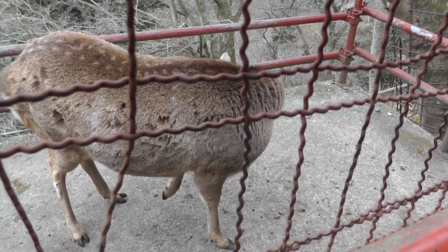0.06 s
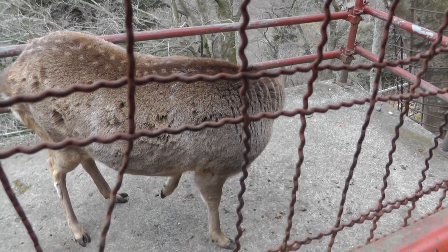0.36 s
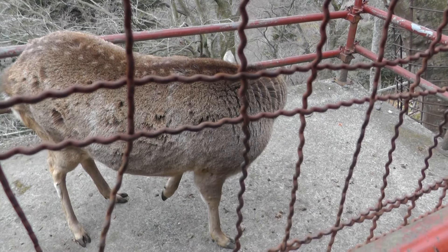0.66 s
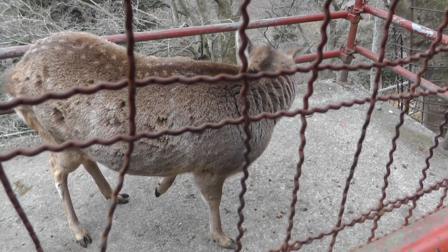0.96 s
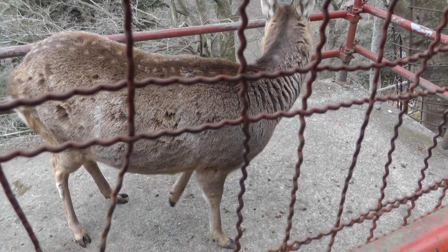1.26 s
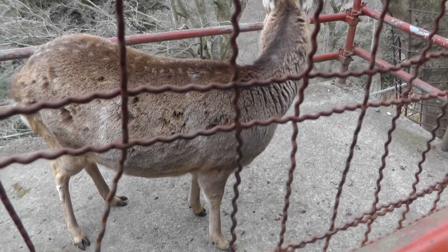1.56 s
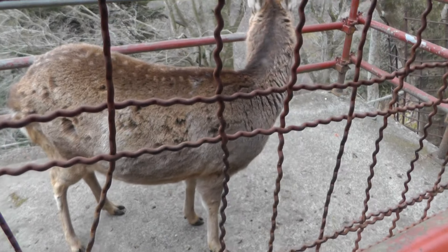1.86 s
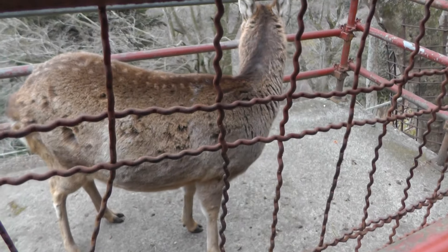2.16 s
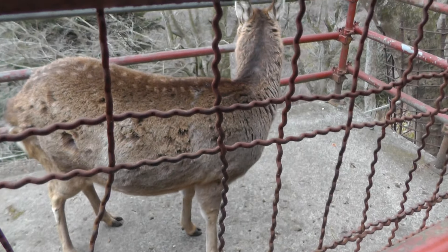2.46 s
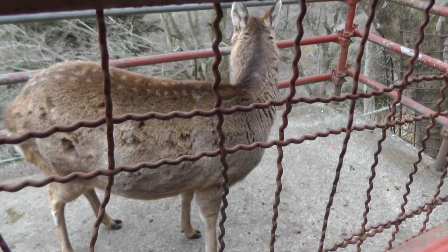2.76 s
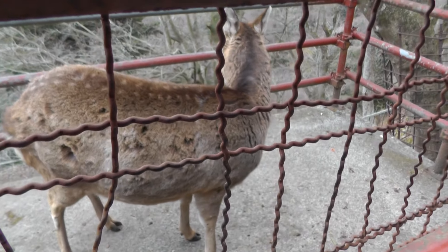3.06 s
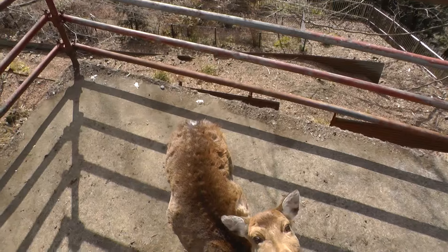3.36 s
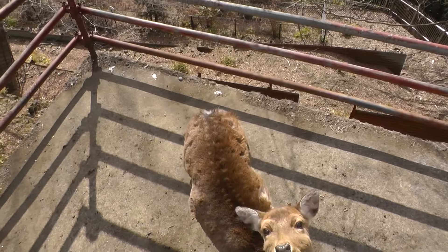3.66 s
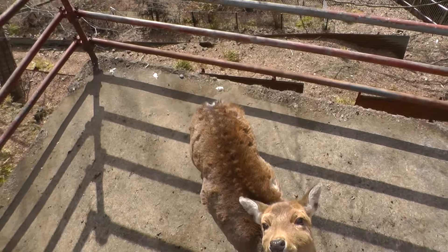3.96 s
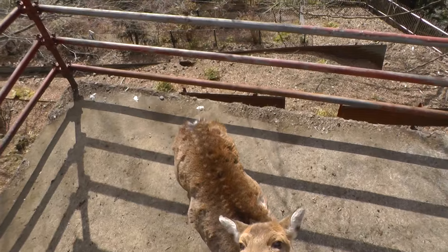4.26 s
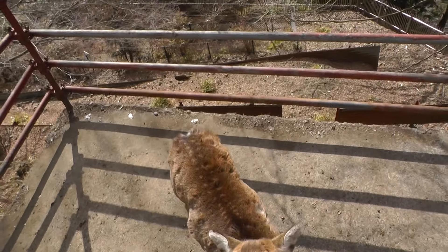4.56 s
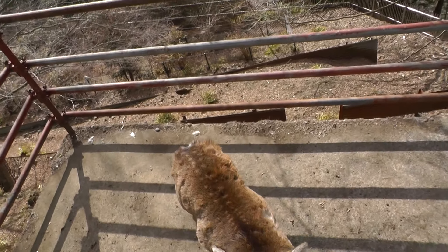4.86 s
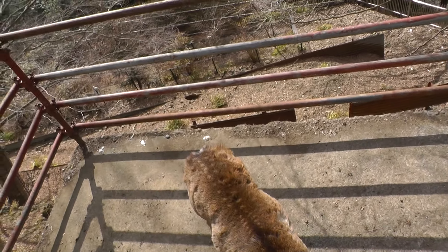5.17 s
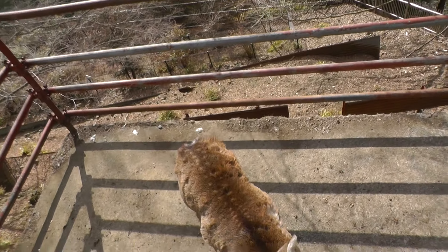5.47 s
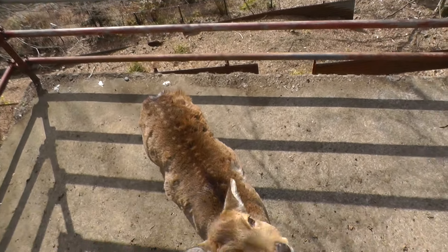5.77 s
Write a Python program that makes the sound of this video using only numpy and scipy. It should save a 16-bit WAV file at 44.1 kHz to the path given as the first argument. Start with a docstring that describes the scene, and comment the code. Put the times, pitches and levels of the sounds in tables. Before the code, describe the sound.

In a quiet outdoor pen, a deer gives one thin, high squeal that arches and ends breathy. A small bird whistles quick phrases behind it while hooves tap lightly on concrete and a camera's zoom motor hums faintly. After a light double tick the sound changes abruptly: cloth rubs and crackles close to the microphone, left of centre, and wind thumps in low gusts. Distant woods murmur softly throughout.

```python
"""Deer squeal in a concrete pen, then cloth and wind

A deer's tight vocal folds give one thin, arched squeal; a small bird whistles in the trees behind.
Hooves tap the floor, a camera's zoom motor hums, something ticks. Then the scene changes abruptly:
cloth rubs and crackles by the left microphone and wind thumps on the camera. Woods murmur throughout."""
import sys
import numpy as np
from scipy import signal
from scipy.fft import rfft, irfft, next_fast_len
from scipy.io import wavfile
from scipy.ndimage import uniform_filter1d, map_coordinates

SR = 44100
rng = np.random.default_rng(int(sys.argv[2]) if len(sys.argv) > 2 else 0)


def unload_audio(sound):
    """Save the sound as a 16-bit wav file, at the path given as the first command line argument."""
    columns = np.transpose(np.atleast_2d(sound))
    # keep every value between -1 and 1, then stretch to whole-number steps
    steps = np.round(np.clip(columns, -1, 1) * 32767)
    wavfile.write(sys.argv[1], SR, steps.astype(np.int16))


N = 260190
CHANGE_S = 3.311

# stereo image of close sounds: (frequency [Hz], left-right likeness [-1..1])
CLOSE_LIKENESS = [(500, 0.97), (2000, 0.74), (6000, 0.94), (7500, 0.3), (9000, -0.37), (12000, -0.65),
                  (15500, -0.72)]


def deer(crest_hz=2059, crest_s=.14, collapse_s=.555, start_s=.13, end_s=.64, jitter=.0045, rasp=.0367):
    """Tight vocal folds whistle and double their period; air rasps through as the pitch drops."""
    # throat and nose response: (frequency [Hz], gain [dB])
    throat = [(1000, -44), (2030, -23.5), (2450, 5), (3050, -16), (3350, 2.5), (3750, -12), (4080, -0.5),
              (5100, -1.5), (5600, 5.5), (6100, -8), (7100, -17), (8150, -14), (9200, -9), (10200, -17),
              (11200, -25), (13500, -30)]
    # breath spectrum: (frequency [Hz], density [dB])
    breath = [(1000, -52), (2000, -17), (3000, -13), (4500, -3), (5600, -3.5), (7000, -14), (8500, -11.5),
              (10500, -19), (12500, -25), (16000, -30)]
    size = SR
    t = np.arange(size) / SR
    climb_hz_per_s, sag_hz_per_s, collapse_hz_per_s, inertia_s = 4400, 150, 6600, .0503
    pitch = (crest_hz - climb_hz_per_s * np.maximum(crest_s - t, 0)
             - sag_hz_per_s * np.maximum(t - crest_s, 0)
             - collapse_hz_per_s * np.maximum(t - collapse_s, 0))
    pitch = uniform_filter1d(np.maximum(pitch, crest_hz / 2), size=int(inertia_s * SR))
    tight_s, tight_length_s = .409, .23
    tight = np.exp(-(2 * (t - tight_s) / tight_length_s) ** 4)
    slack = 1 - pitch / crest_hz
    air_share = np.clip(.32 - .19 * tight + 1.25 * slack, 0, 1)
    pitch = pitch * (1 + jitter * wobble(260, size) + rasp * air_share * wobble(900, size))
    phase = 2 * np.pi * np.cumsum(pitch) / SR

    def partial(k, flutter_db=3):
        return amp(along(throat, k * pitch) + flutter_db * wobble(69.7, size)) * np.sin(k * phase)

    doubling = amp(-19 + 14.5 * tight)  # lines halfway between harmonics
    tone = sum(partial(k) + doubling * partial(k + .5) for k in range(1, 7))
    air = coloured(rng.standard_normal(size) * (1 + .5 * np.cos(phase)), breath)  # pulsed by the folds
    voice = voice_crack(t) + amp(1) * np.sqrt(1 - air_share) * tone + amp(-2) * np.sqrt(air_share) * air
    swell_db = -47.5 + 3 * (t - start_s)
    envelope = amp(swell_db) * held(t, start_s, end_s, attack_s=.1, release_s=.087)
    return pan(-3.5) * outdoors(np.pad(envelope * voice, (0, N - size)), wet_db=-5, likeness=.54)


def voice_crack(t, at_s=.185, length_s=.019, centre_hz=2500, width_hz=760):
    """The voice cracks once into a low rasp."""
    noise = filtered(rng.standard_normal(len(t)), lambda hz: resonance(hz, centre_hz, width_hz) ** 2)
    return amp(-8.5) * unit(noise) * np.exp(-(2 * (t - at_s) / length_s) ** 2)


def bird(arch_after_s=.129, arch_gap_s=.098, flutter_db=2):
    """Phrases of a slur and two arches, then flicks; in the slur both sides of the syrinx sound."""
    # syllable contours: (time [s], pitch [Hz], relative level [dB])
    slur = [(0, 5870, -12), (.007, 6550, -2), (.016, 6190, 0.5), (.026, 5650, -13), (.047, 5290, -0.5),
            (.062, 4700, -5), (.078, 4330, -3), (.098, 4100, -28)]
    undertone = [(0, 4090, -45), (.014, 4350, -14), (.026, 4700, -8), (.046, 5250, -2), (.06, 5450, -32)]
    arch = [(0, 6950, -31), (.012, 8100, -15.5), (.03, 8840, -19.5), (.04, 7890, -2.5), (.048, 7740, -7),
            (.058, 8150, -6.5), (.07, 7520, -6), (.077, 6400, -23)]
    flick = [(0, 3620, -17), (.008, 4710, -5.5), (.02, 5390, -4.5), (.027, 6460, 4.5), (.032, 7000, -0.5),
             (.043, 5700, -21)]
    # phrases: (start [s], slur gain [dB], arch gain [dB])
    phrases = [(0.527, -57, -47.5), (.923, -52.5, -45.5), (1.317, -50, -46.5), (1.715, -47.5, -46),
               (2.122, -46.5, -44)]
    # closing flicks: (start [s], gain [dB])
    flicks = [(2.5, -45.5), (2.601, -46), (2.711, -49), (3.249, -53)]
    song = np.zeros(N)
    for s, slur_db, arch_db in phrases:
        add(song, s, amp(slur_db) * syllable(slur, onset_rasp=.021))
        add(song, s, amp(slur_db) * syllable(undertone))
        for k in range(2):
            add(song, s + arch_after_s + k * arch_gap_s, amp(arch_db) * syllable(arch))
    for s, db in flicks:
        add(song, s, amp(db) * syllable(flick, onset_rasp=.237))
    return pan(2) * outdoors(song * amp(flutter_db * wobble(200)), wet_db=-3, likeness=.81)


def syllable(contour, onset_rasp=0, steady_rasp=.018, clear_s=.0313):
    """One swept whistle; rasp is its tremble as a share of the pitch."""
    times, pitches, levels = np.transpose(contour)
    t = np.arange(int(times[-1] * SR)) / SR
    rasp = steady_rasp + onset_rasp * np.maximum(1 - t / clear_s, 0)
    pitch = np.interp(t, times, pitches) * (1 + rasp * wobble(1500, SR // 4)[:len(t)])
    return amp(np.interp(t, times, levels)) * np.sin(2 * np.pi * np.cumsum(pitch) / SR)


def hooves(clack_t60_s=.0095, grit_t60_s=.12, grit_db=-15):
    """Horn clacks on concrete and grinds a little grit."""
    # hoof contacts: (time [s], relative level [dB], tilt [dB/octave])
    contacts = [(0.886, -47, 11), (0.905, -54, -2), (1.523, -46, -6), (1.6075, -35, 1.5),
                (1.708, -32.5, -1.5), (2.48, -47.5, 2), (2.695, -45, -1)]
    # clack spectrum: (frequency [Hz], density [dB])
    spectrum = [(100, -24), (350, 0.5), (550, 0.5), (850, -4.5), (1350, 0.5), (2100, -14.5), (3300, -8.5),
                (5000, -13.5), (8000, -17.5), (15000, -59)]
    steps, t = np.zeros(N), np.arange(SR // 8) / SR
    decay = amp(-60 * t / clack_t60_s) + amp(grit_db - 60 * t / grit_t60_s)
    for s, db, tilt in contacts:
        noise = rng.standard_normal(len(t))
        noise = filtered(noise, lambda hz: amp(along(spectrum, hz) + tilt * np.log2(hz / 1000 + .25)))
        clack = noise * decay
        add(steps, s, amp(db - 6.5) * clack / np.sqrt(np.mean(clack[:128] ** 2)))
    return outdoors(steps, wet_db=-9, likeness=.55)


def cloth():
    """A jacket rubs by the left microphone: hiss over hollow scuffing, and creases flipping over."""
    # rubbing spectra: (frequency [Hz], density [dB])
    hiss_spectrum = [(940, -34), (1600, -7), (2010, -9.5), (3100, -3), (4050, -8.5), (4680, -3),
                     (5890, -3.5), (7270, -7), (8980, -13.5), (13400, -17), (15200, -17), (15800, -16)]
    body_spectrum = [(100, -10), (250, -4), (450, 4), (680, 4.5), (1000, 1), (1400, -1), (1900, -12),
                     (3000, -56), (6000, -58)]
    # stereo balance: (frequency [Hz], left minus right [dB])
    balance = [(200, 2.5), (380, 1.5), (700, 1.5), (1290, 5), (2380, 5.5), (4400, 4.5), (8120, 4.5),
               (12000, -1)]
    # big creases: (time [s], relative level [dB], pitch [Hz])
    big_creases = [(4.063, -26, 5370), (4.143, -17, 4220), (4.37, -27, 5700), (4.529, -24.5, 2820),
                   (4.839, -22, 5090), (4.948, -27, 5350), (5.148, -19, 3700), (5.2205, -24, 4040),
                   (5.2344, -20.5, 1050), (5.692, -17.5, 680), (5.716, -21, 4200), (5.771, -18, 4500),
                   (5.792, -16.5, 810), (5.864, -19, 5120), (5.878, -16, 5900)]
    hiss_gain, body_gain = rubbing()
    grip = amp(wobble(45) + .36 * wobble(220))  # contact tightens and slackens
    hiss = coloured(grip * friction(slips_per_s=760, slip_share=.23, patchy_db=.8), hiss_spectrum)
    body = coloured(grip * friction(slips_per_s=350, slip_share=.26, patchy_db=0), body_spectrum)
    creases = [*big_creases, *small_creases(hiss_gain)]
    crackle = snaps(creases, ring_t60_s=.019, width_share=.35, gain_db=-9, click_db=-9)
    return filtered(hiss_gain * hiss + body_gain * body + crackle, lambda hz: pan(along(balance, hz)))


def rubbing(rest_hiss_db=-51, rest_body_db=-52, fade_db_per_s=8):
    """Hiss and body gains: each stroke takes hold, eases and lets go, over a light resting contact."""
    # cloth strokes: (start [s], length [s], attack [s], hiss gain [dB], body gain [dB])
    strokes = [(3.312, .18, .03, -42.5, -44.5), (3.548, .25, .1, -48, -49.5),
               (3.859, 0.17, 0.13, -39.5, -43.5), (4.069, .17, .1, -42, -43.5),
               (4.565, .17, .1, -48, -53.5), (4.831, .13, .17, -39, -42.5), (5.001, 0.023, .06, -38, -39.5),
               (5.127, .11, .06, -36.5, -38), (5.312, .055, .1, -39, -39.5), (5.479, 0.13, 0.16, -40, -41),
               (5.705, .17, .06, -34.5, -34)]
    t = np.arange(N) / SR
    hiss, body = amp(rest_hiss_db), amp(rest_body_db)
    for s, length_s, attack_s, hiss_db, body_db in strokes:
        fade = amp(-fade_db_per_s * np.maximum(t - s, 0))
        stroke = fade * held(t, s, s + length_s, attack_s, release_s=.098)
        hiss = np.hypot(hiss, amp(hiss_db) * stroke)
        body = np.hypot(body, amp(body_db) * stroke)
    return hiss, body


def friction(slips_per_s, slip_share, patchy_db):
    """Fibres slide (noise) and catch (sparse slips); patchy_db adds shifting colour."""
    catches = (rng.random(N) < slips_per_s / SR) * rng.standard_normal((2, N))
    drive = np.sqrt(1 - slip_share) * rng.standard_normal((2, N)) + np.sqrt(slip_share) * unit(catches)
    spectra = signal.stft(drive, nperseg=256)[2]
    patches = uniform_filter1d(rng.standard_normal(spectra.shape[1:]), 5, axis=0)
    patches = unit(uniform_filter1d(patches, 8, axis=1))
    rub = signal.istft(spectra * amp(patchy_db * patches), nperseg=256)[1][:, :N]
    return spread(rub, CLOSE_LIKENESS)


def small_creases(rub, count=16, over_db=13, centre_hz=4030, scatter_octaves=.43):
    """Random rows for snaps(): a harder rub flips more and louder creases."""
    travel = np.cumsum(rub * (np.arange(N) / SR > CHANGE_S))
    at = np.searchsorted(travel, travel[-1] * (np.arange(count) + rng.random(count)) / count)
    pitch_hz = centre_hz * 2 ** (scatter_octaves * rng.standard_normal(count))
    return zip(at / SR, 20 * np.log10(rub[at]) + over_db, pitch_hz)


def snaps(rows, ring_t60_s, width_share, gain_db, click_db, click_t60_s=.0084, rise_s=.000088):
    """Short bursts, each a bright click and a noisy ring around its own pitch."""
    track, t = np.zeros((2, N)), np.arange(SR // 30) / SR
    for s, db, pitch in rows:
        noise = rng.standard_normal((2, len(t)))
        ring = filtered(noise, lambda hz: resonance(hz, pitch, pitch * width_share) / (1 + (hz / 9e3)**4))
        click = amp(click_db - 60 * t / click_t60_s) * rng.standard_normal((2, len(t)))
        burst = (unit(ring) * amp(-60 * t / ring_t60_s) + click) * (1 - np.exp(-t / rise_s))
        add(track, s, amp(db + gain_db) * burst / np.sqrt(np.mean(burst[0, :100] ** 2)))
    return spread(track, CLOSE_LIKENESS)


def wind(breeze_db=-49, lumps_db=4, rise_cycles=.59):
    """Gusts buffet the microphones; puffs push them for a cycle or two."""
    # buffeting spectrum: (frequency [Hz], density [dB])
    spectrum = [(20, -17), (45, -7), (75, 0.5), (105, 1), (135, -2.5), (180, -7.5), (260, -9), (450, -16),
                (1000, -43)]
    # gusts: (start [s], length [s], level [dB])
    gusts = [(3.336, .33, -42), (3.77, 0.27, -43.5), (4.326, 0.43, -43), (5.083, .07, -42),
             (5.509, .05, -45), (5.802, .08, -41)]
    # puffs on the camera body: (time [s], envelope peak [dB], pitch [Hz])
    puffs = [(3.318, -30, 95), (3.352, -27.5, 110), (3.439, -29, 128), (3.641, -22.5, 156),
             (3.789, -16, 130), (3.806, -15.5, 147), (4.004, -26.5, 164), (4.523, -28.5, 146),
             (5.07, -27.5, 138), (5.101, -28, 85.6), (5.155, -34, 109)]
    t = np.arange(N) / SR
    gains = [amp(db) * held(t, s, s + length, attack_s=.12, release_s=.23) for s, length, db in gusts]
    strength = np.hypot(amp(breeze_db), np.linalg.norm(gains, axis=0))
    lumps = amp(lumps_db * wobble(30))
    rumble = coloured(spread(rng.standard_normal((2, N)), [(100, .92)]), spectrum)
    air = strength * unit(lumps * rumble)
    for s, db, pitch_hz in puffs:
        cycles = t[:SR // 10] * pitch_hz
        age = cycles / rise_cycles
        add(air, s, amp(db) * age * np.exp((1 - age ** 2) / 2) * np.sin(2 * np.pi * cycles))
    return air


def ticks():
    """A light double tick."""
    # tick parts: (time [s], relative level [dB], pitch [Hz])
    parts = [(3.034, -46, 3550), (3.0455, -38.5, 3420), (3.046, -48, 6500)]
    return snaps(parts, ring_t60_s=.023, width_share=.08, gain_db=-7.5, click_db=-8)


def zoom_motor(waver_db=1.5, ramp_s=.067):
    """A narrow, grainy hum in the camera body, mostly at the right microphone."""
    # motor runs: (start [s], length [s], relative level [dB])
    runs = [(0, 0.63, -57), (1.715, 1.6, -58.5)]
    # hum spectrum: (frequency [Hz], density [dB])
    spectrum = [(400, -36), (660, -16), (742, -2.5), (830, -21.5), (1250, -28), (1650, -42), (1850, -26),
                (2100, -42), (5000, -71)]
    t = np.arange(N) / SR
    running = sum(amp(db) * held(t, s, s + length, ramp_s, ramp_s) for s, length, db in runs)
    hum = running * amp(waver_db * wobble(24.92)) * coloured(rng.standard_normal(N), spectrum)
    return np.array([[-.35], [1.5]]) * hum


def woods(murmur_db=-59, whirr_db=-66):
    """Steady, distant hillside murmur with a faint hollow whirr."""
    # murmur spectrum: (frequency [Hz], density [dB])
    spectrum = [(25, -18), (60, -6), (130, 2), (290, -2.5), (480, -7.5), (850, -10), (1500, -16.5),
                (2100, -25.5), (2700, -17.5), (4100, -27), (5400, -32), (7000, -24), (9000, -26.5),
                (15800, -28.5)]
    # murmur stereo image: (frequency [Hz], left-right likeness [-1..1])
    likeness = [(130, 0.97), (290, 0.77), (640, 0.22), (1400, 0.044), (3100, 0.077), (7000, 0.56),
                (15000, 0.1)]
    # whirr bands: (centre [Hz], width [Hz], relative level [dB])
    bands = [(1440, 440, -2), (1833, 43, 1.5), (2406, 230, 1.5), (2795, 140, 2), (3333, 270, 3.5),
             (3690, 130, -8), (5260, 2400, 0)]
    gain = amp(murmur_db + .24 * wobble(5.44))
    murmur = gain * coloured(spread(rng.standard_normal((2, N)), likeness), spectrum)
    whirr = lambda hz: sum(amp(db) * abs(resonance(hz, centre, width)) ** 2 for centre, width, db in bands)
    return murmur + amp(whirr_db) * unit(filtered(rng.standard_normal(N), whirr))


def outdoors(x, wet_db, likeness):
    """Direct sound plus scatter from trunks, rails and ground."""
    # scatter decay: (frequency [Hz], t60 [s])
    decay = [(200, 0.089), (2000, 0.15), (5000, 0.31), (8000, 0.24), (15000, 0.044)]
    hz, t, spectra = signal.stft(rng.standard_normal((2, SR // 2)), SR, nperseg=256)
    tail = signal.istft(spectra * amp(-60 * t / along(decay, hz)[:, None]), SR, nperseg=256)[1]
    tail = spread(tail / np.linalg.norm(tail[0]), [(1000, likeness)])
    return x + amp(wet_db) * signal.fftconvolve(x[None], tail, axes=1)[:, :N]


def amp(db):
    """Decibels to gain."""
    return 10 ** (np.asarray(db) / 20)


def unit(x):
    """Scaled to rms 1."""
    return x / np.sqrt(np.mean(x ** 2) + 1e-20)


def along(points, hz):
    """(Hz, value) points read on a log axis."""
    f, v = np.transpose(points)
    return np.interp(np.log(hz + 1), np.log(f + 1), v)


def wobble(rate_hz, size=N):
    """Smooth random curve, rate_hz knots a second."""
    knots = rng.standard_normal(int(size * rate_hz / SR) + 4)
    return map_coordinates(knots, [np.arange(size) * rate_hz / SR])


def held(t, start_s, end_s, attack_s, release_s):
    """Gain 1 from start to end; 20 dB rise per attack before, 20 dB fall per release after."""
    return amp(-20 * (np.maximum(start_s - t, 0) / attack_s + np.maximum(t - end_s, 0) / release_s))


def resonance(hz, centre_hz, width_hz):
    """Response of one damped resonance."""
    return 1j * hz * width_hz / (centre_hz ** 2 - hz ** 2 + 1j * hz * width_hz)


def filtered(x, response):
    """x through a frequency response."""
    n = x.shape[-1]
    m = next_fast_len(n + 8192)
    return irfft(rfft(x, m) * response(np.fft.rfftfreq(m, 1 / SR)), m)[..., :n]


def coloured(x, spectrum):
    """x through a (Hz, dB) spectrum, at rms 1."""
    return unit(filtered(x, lambda hz: amp(along(spectrum, hz))))


def spread(pair, likeness):
    """Two unrelated sounds mixed to a (Hz, left-right likeness) curve."""
    turn = lambda hz: np.arccos(np.clip(along(likeness, hz), -1, 1)) / 2
    mid, side = filtered(pair, lambda hz: np.array([np.cos(turn(hz)), np.sin(turn(hz))]))
    return np.array([mid + side, mid - side])


def pan(db):
    """Channel gains for a left-minus-right level."""
    return amp(np.array([[.5], [-.5]]) * db)


def add(track, s, sound):
    """Mix a sound into a track at s seconds."""
    part = track[..., max(0, round(s * SR)):][..., :sound.shape[-1]]
    part += sound[..., :part.shape[-1]]


def scene(crossfade_s=.002):
    """The quiet pen, then abruptly close rustle and wind; woods under both."""
    later = np.clip((np.arange(N) / SR - CHANGE_S) / crossfade_s, 0, 1)
    pen = deer() + bird() + hooves() + zoom_motor() + ticks()
    return woods() + (1 - later) * pen + later * (cloth() + wind())


def record(dry, low_cut_hz=45, top_hz=15900):
    """The camera thins the deepest bass and passes nothing above its band limit."""
    return filtered(dry, lambda hz: (hz < top_hz) * hz ** 2 / np.sqrt(hz ** 4 + low_cut_hz ** 4))


dry = scene()
out = record(dry)
unload_audio(out)
```